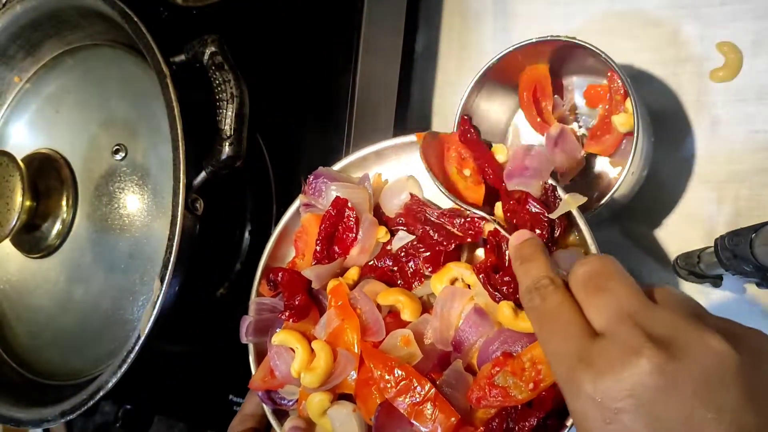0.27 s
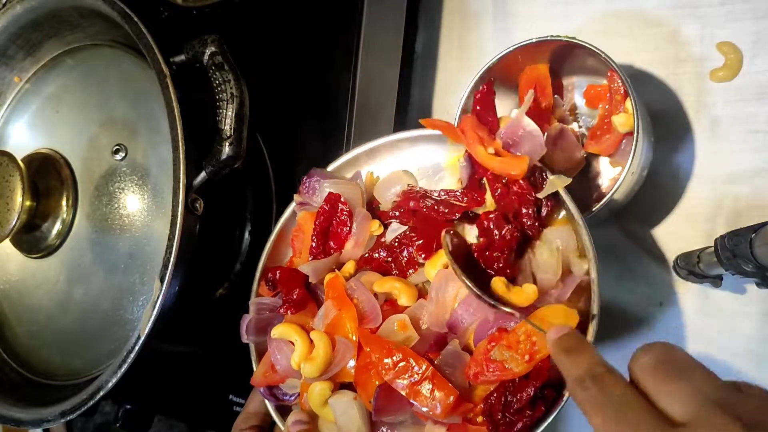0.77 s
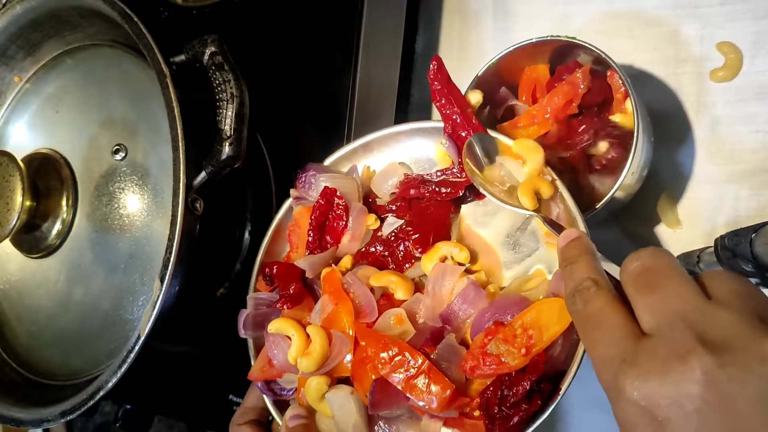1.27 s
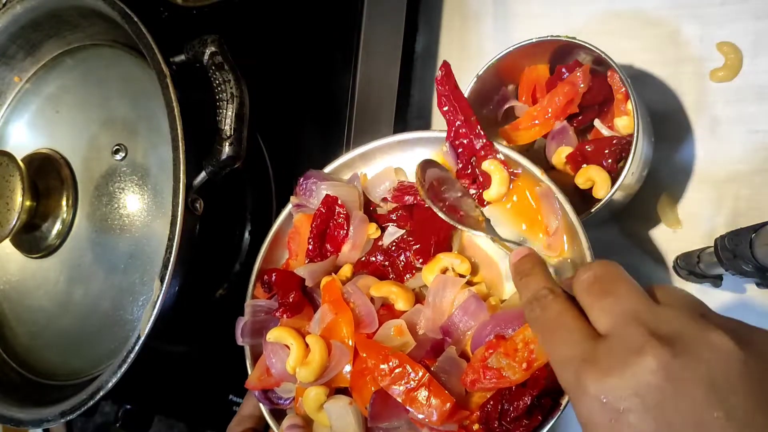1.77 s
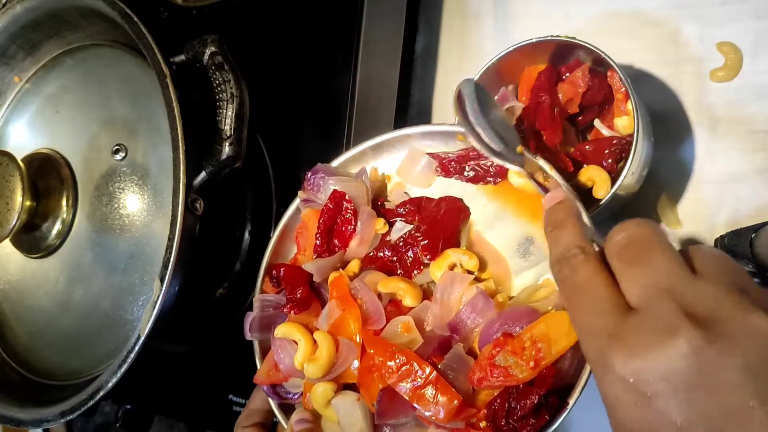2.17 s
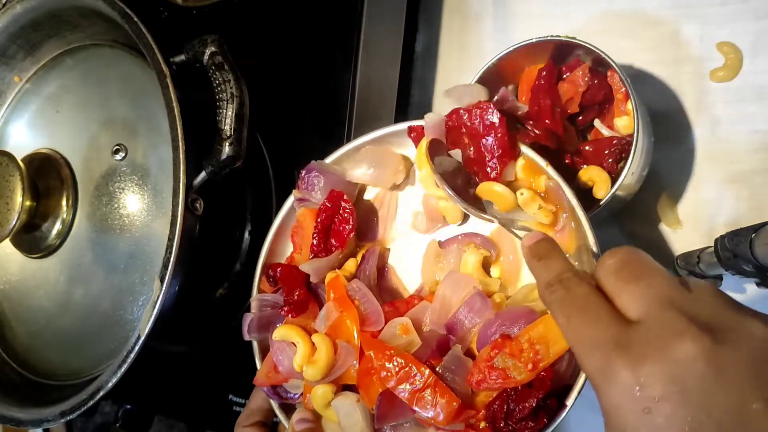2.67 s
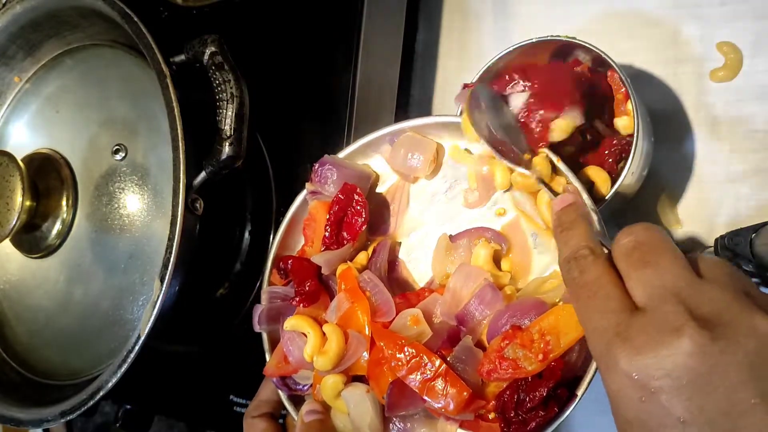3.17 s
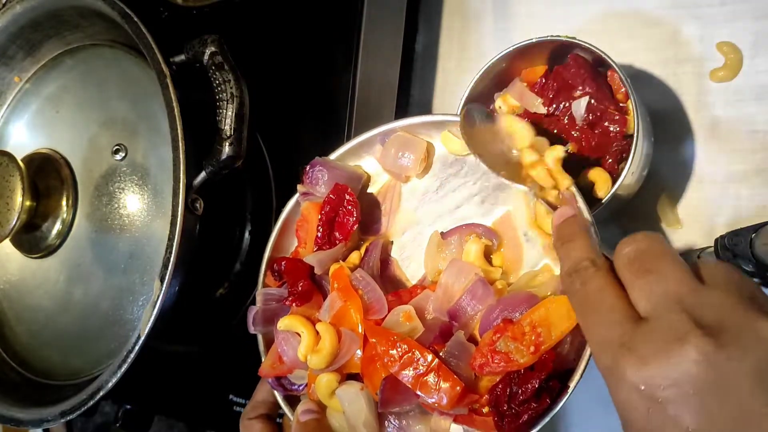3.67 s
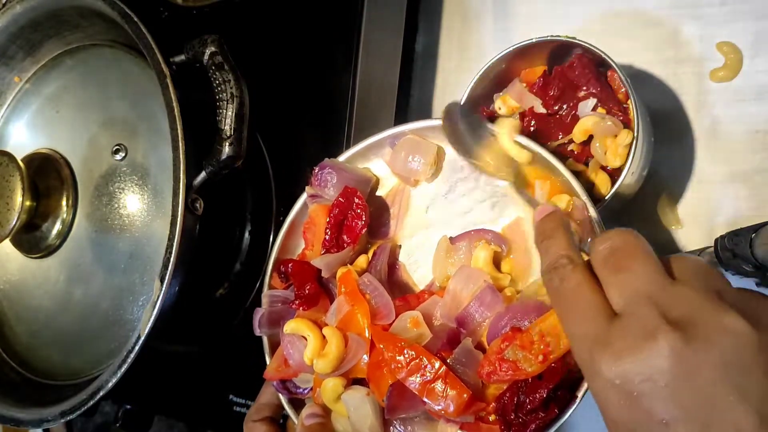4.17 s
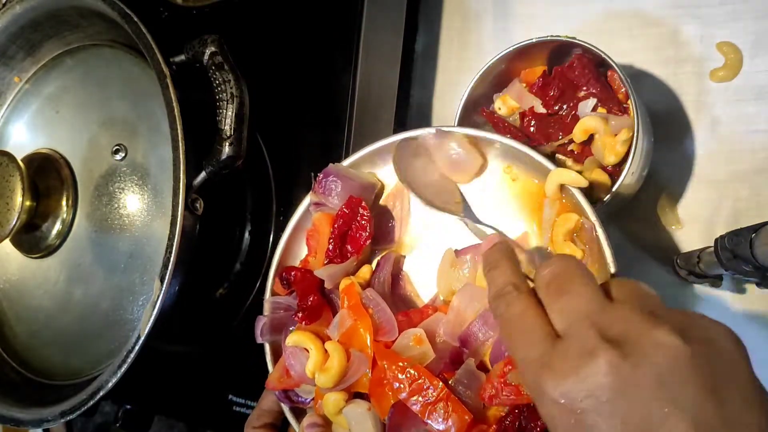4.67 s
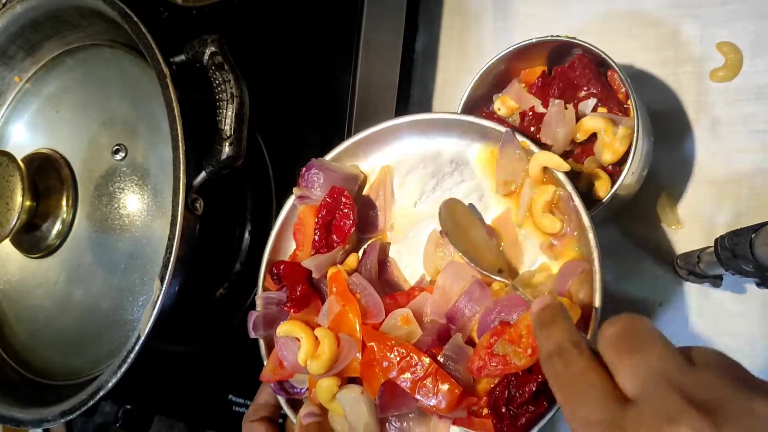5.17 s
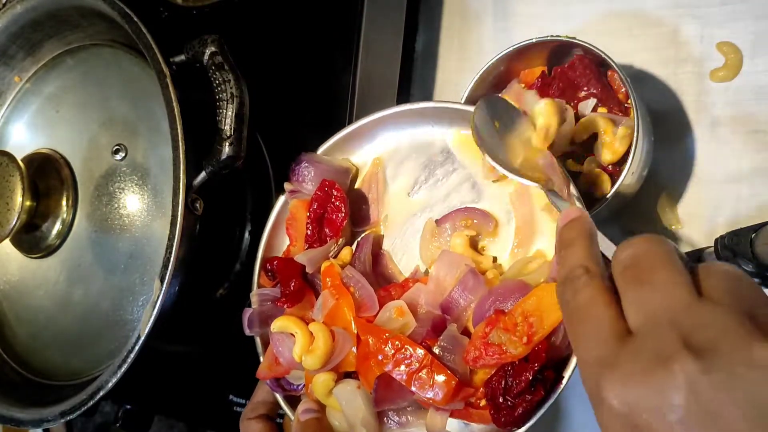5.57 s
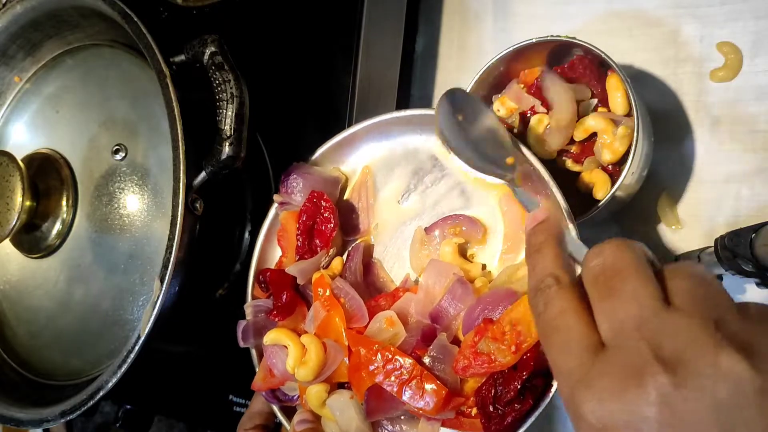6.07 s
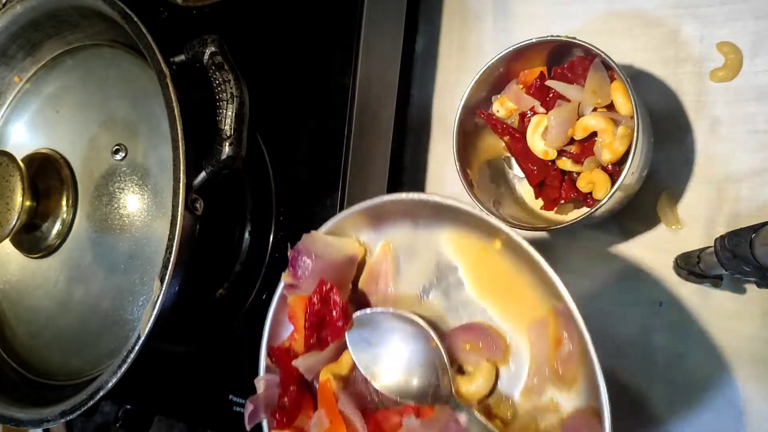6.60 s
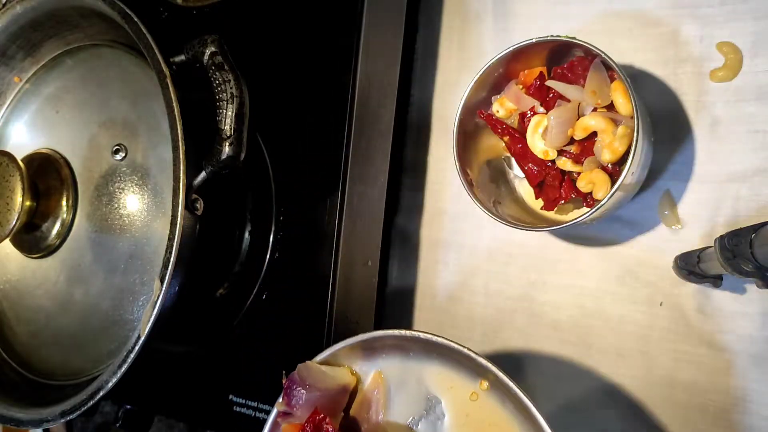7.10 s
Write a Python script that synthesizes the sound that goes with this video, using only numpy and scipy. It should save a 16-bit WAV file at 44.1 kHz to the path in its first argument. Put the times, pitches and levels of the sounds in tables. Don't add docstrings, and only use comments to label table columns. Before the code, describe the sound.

Steady whirring fan with rushing air, broken by short metallic spoon knocks, raspy plate scrapes and soft thuds of falling food.

```python
import sys
import numpy as np
from scipy import signal
from scipy.fft import rfft, irfft, next_fast_len
from scipy.io import wavfile
from scipy.ndimage import uniform_filter1d

SR = 44100
rng = np.random.default_rng(int(sys.argv[2]) if len(sys.argv) > 2 else 0)


def gain_from_db(level_db):
    decades = np.asarray(level_db, float) / 20
    return 10 ** decades


def inscribe(sig):
    pcm = np.round(np.clip(np.atleast_2d(sig).T, -1, 1) * 32767)
    wavfile.write(sys.argv[1], SR, pcm.astype(np.int16))


N = 323649
T = np.arange(N) / SR
HZ = np.maximum(np.fft.rfftfreq(next_fast_len(N, real=True), 1 / SR), 1)
MID_SIDE = np.array([[1], [-1]])

# frequency in Hz, left minus right in dB.
FAN_LEAN = [(60, 1), (110, 3), (200, -4), (370, -1), (680, -1), (1250, 0.5), (2290, -1.0), (4210, -1.0),
            (7720, -2), (14200, 12.5)]
# frequency in Hz, width in Hz, level in dB.
PLATE_MODES = [(955, 47, 0.5), (1623, 41, 10), (1990, 147, 11.5), (2380, 33, -23), (2930, 93, -4),
               (4050, 80, 2), (4420, 18, -0.5), (4500, 31, 4), (4990, 150, 0), (5220, 75, 1.5),
               (6010, 96, 2), (6760, 17, -32), (7150, 370, 8), (7600, 32, -57), (8330, 40, 6),
               (8114, 34, 7), (9150, 57, 0), (9820, 37, -21.5), (10500, 25, -37), (10900, 33, -12),
               (11100, 23, -40), (11700, 48, -39), (11800, 220, -41), (12700, 27, -25), (12700, 130, -26)]
# start in seconds, peak in dB, favoured pitch in Hz, share of crack in dB,
# dullness in dB per octave.
SPOON_BLOWS = [(0.9476, -19.5, 2380, 1, 3), (1.0562, -46, 3360, -3, 0), (1.1886, -44.5, 2000, 11.5, 15),
               (1.242, -50, 2900, 8.5, 1.5), (1.4051, -47, 6960, 4, -8), (1.455, -44.5, 2900, -8, 0),
               (1.9492, -40, 2186, 4, 0.5), (1.999, -46.5, 2160, 7, 2.5), (2.35, -55, 2286, -12, -7),
               (2.5974, -57, 2080, -34, 6), (2.6139, -55, 2330, 14, 16), (2.6525, -49, 3100, 3, -4.5),
               (3.532, -17, 1750, -4.5, 3), (3.5968, -29.5, 1990, -3, 1.5), (4.0374, -10.5, 1758, 1, 11),
               (4.0462, -21, 1750, 0, 4), (4.1165, -15, 4990, -2, 1.7), (4.5851, -30.5, 3150, 6, 5.5),
               (4.7252, -16.5, 2900, 3, 2.5), (5.3672, -18.5, 1360, -2.5, 10.5),
               (5.8731, -14.5, 1670, 0.5, 7), (5.9614, -16.5, 2090, -5, 8.5),
               (6.0041, -28.5, 6590, -1.5, -0.5)]


def table(points, hz):
    f, v = np.transpose(points)
    return np.interp(np.log(hz), np.log(np.maximum(f, 1)), v)


def unit(x):
    return x / np.sqrt(np.mean(x ** 2))


def colour(x, db):
    size = next_fast_len(N, real=True)
    return irfft(rfft(x, size) * gain_from_db(db), size)[..., :N]


def walk(rate, size=N):
    k = int(SR / rate)
    steps = np.repeat(rng.standard_normal(size // k + 1), k)
    return unit(uniform_filter1d(uniform_filter1d(steps, k), k)[:size])


def resonances(peaks, order):
    return sum(db / (1 + (2 * (HZ - hz) / width) ** order) for hz, width, db in peaks)


def modes(peaks):
    hz, width, db = np.transpose(peaks)
    width = np.maximum(width, 34)
    return hz, db + 20 * np.log10(width), np.log(1000) / np.pi / width


def ring(push, hz, db, t60, spread, sway_db=0):
    out = np.zeros((2, push.shape[-1]))
    pushes = np.broadcast_to(push, (len(hz), push.shape[-1]))
    for f, gain, fall_s, turn, drive in zip(hz, gain_from_db(db), t60, spread, pushes):
        if sway_db:
            drive = drive * gain_from_db(sway_db * walk(22))
        pole = np.exp((2j * np.pi * f - np.log(1000) / fall_s) / SR)
        z = signal.lfilter([gain], [1, -pole], drive)
        out += z.imag * np.cos(turn) + z.real * np.sin(turn) * MID_SIDE
    return out


def comb(bins):
    depth_db, fineness_hz = 6, 45
    k = max(int(fineness_hz * bins * 2 / SR), 1)
    return depth_db * unit(uniform_filter1d(uniform_filter1d(rng.standard_normal(bins), k), k))


def air():
    # frequency in Hz, density in dB per Hz.
    rush = [(12, -65), (28, -8.5), (48, -8.5), (102, -8), (154, -6), (209, -9.5), (325, -11.5), (383, -15),
            (452, -5.5), (665, -17.5), (1900, -24), (2300, -23), (3210, -29), (3480, -29.5), (9150, -34.5),
            (14600, -51.5)]
    # frequency in Hz, side minus mid in dB.
    diffuseness = [(60, 3), (110, -16), (200, 2), (370, -38), (680, -1), (1250, 2), (2290, -2), (4210, 2.5),
                   (7720, -10.5), (14200, -14)]
    # frequency in Hz, width in Hz, lift in dB.
    duct = [(101, 11, 6.5), (126, 5.5, 7.5), (161, 4.7, 8), (322, 44, 9.5), (449, 66, 9.5), (492, 40, 4.5),
            (826, 37, 6.5), (1142, 13, 7.5), (2226, 300, 7), (5600, 140, 4), (7030, 230, 3.5)]
    # time in seconds, level in dB.
    sizzle = [(0, -1), (1.5, -1.2), (3, -1), (5, -1), (6.5, -1.5), (7.34, -0.5)]
    db = table(rush, HZ) + resonances(duct, 4)
    mid = colour(rng.standard_normal(N), db)
    side = colour(rng.standard_normal(N), db + table(diffuseness, HZ))
    lean = table(FAN_LEAN, HZ) / 2
    pair = np.array([colour(mid + side, lean), colour(mid - side, -lean)])
    bass = uniform_filter1d(pair, size=21)
    pair = bass + (pair - bass) * gain_from_db(np.interp(T, *np.transpose(sizzle)))
    return pair * gain_from_db(-50.5 + .5 * walk(1.3)) / np.sqrt(np.mean(mid ** 2))


def motor(wobble_db=1.95, drift_rad=0.84, turn=0.57):
    # frequency in Hz, rms level in dB.
    lines = [(215.3, -74), (333.8, -64), (436.0, -56.5), (532.9, -60.5), (581.4, -96), (737.5, -74.5),
             (818.3, -84), (1599, -79.5), (1798, -81), (2083, -71.5), (2180, -94), (2277, -72),
             (2326, -69.5), (2859, -81), (3440, -73.5), (5755, -83.5)]
    out = 0
    for hz, db in lines:
        phase = 2 * np.pi * hz * T + drift_rad * walk(2.884) + 2 * np.pi * rng.random()
        side = np.tanh(turn * np.log2(hz / 60) * rng.standard_normal() * 0.31)
        level = gain_from_db(db + table(FAN_LEAN, hz) * MID_SIDE / 2) * gain_from_db(wobble_db * walk(13))
        tone = np.sqrt(2) * level * np.sin(phase + side * MID_SIDE)
        out = out + tone / max(np.cos(side), .5)
    return out


def blade():
    tone_hz, drift_hz, level_db, sway_db = 157.2, 0.36, -52.8, -0.4
    phase = 2 * np.pi * np.cumsum(tone_hz + drift_hz * walk(2.81)) / SR
    level = gain_from_db(level_db + sway_db * walk(3.85) + 1.4 * MID_SIDE)
    return np.sqrt(2) * level * np.sin(phase + 0.2 * MID_SIDE)


def thuds():
    # start in seconds, pitch in Hz, level in dB, t60 in seconds.
    lumps = [(6.04, 190, -44, .12), (4.243, 270, -46, .08), (1.058, 1150, -41, .08),
             (1.078, 1300, -43, .06), (1.243, 1350, -47, .04), (1.42, 1550, -47, .08),
             (4.195, 1580, -40, .2), (4.828, 1500, -42, .06), (4.855, 1300, -43, .08),
             (5.993, 910, -42, .2), (5.55, 920, -51, .1), (4.745, 920, -41, .05), (1.456, 2780, -48, .07),
             (5.552, 2840, -42, .05), (4.638, 4050, -46, .12), (5.385, 930, -44, .3),
             (1.951, 1400, -48, .05), (2.0, 1400, -49, .06), (0.949, 2050, -30, .05)]
    out, t = np.zeros(N), T[:SR // 2]
    for s, hz, db, t60 in lumps:
        i = int(s * SR)
        soft_start = 1 - np.exp(-t / 0.00095)
        out[i:i + len(t)] += gain_from_db(db - 60 * t / t60) * soft_start * np.sin(2 * np.pi * hz * t)
    return out


def ticks():
    # start in seconds, peak in dB, seconds to fall 20 dB.
    taps = [(1.9494, -47, .008), (2.6527, -44, .005), (4.1172, -29, .005), (4.0378, -30, .004),
            (5.9618, -33, .004), (4.2113, -33, .005), (4.7256, -30, .005)]
    out, t = np.zeros((2, N)), T[:SR // 20]
    for s, db, fall_s in taps:
        mid, side = rng.standard_normal((2, len(t)))
        bright = np.diff(mid + .5 * side * MID_SIDE, prepend=0) / 3
        i = int(s * SR)
        out[:, i:i + len(t)] += bright * gain_from_db(db - 20 * t / fall_s)
    return out


def pressure():
    # time of most pressure in seconds, level in dB, seconds to rise 20 dB,
    # seconds to fall 20 dB, weight in dB (more low ring, less hiss).
    slides = [(0.993, -36, 0.027, 0.14, -5), (1.055, -37.5, 0.067, 0.078, -0.5),
              (1.14, -53.5, .03, 0.16, 5.5), (1.25, -54, 0.44, .03, 0), (1.404, -46, 0.028, 0.19, -1),
              (1.445, -41, 0.058, 0.074, -2), (1.96, -52, .01, 0.37, 1.5), (2.008, -48, .03, .03, 4),
              (2.656, -62, .01, 0.24, -8), (3.598, -35, 0.05, 0.048, 0.5), (4.08, -38.5, 0.026, .15, -3),
              (4.231, -29, 0.071, 0.043, -1.8), (4.212, -29, 0.014, 0.087, 0.5),
              (4.605, -40.5, 0.013, 0.48, 0), (4.705, -34, 0.076, .03, -1.5),
              (4.822, -34.5, 0.049, 0.12, -0.5), (4.87, -35.5, .1, 0.03, -3), (5.24, -61, 0.11, 0.29, 4),
              (5.44, -41.5, 0.093, 0.19, 2), (5.554, -38, 0.031, 0.044, 0), (5.93, -42, 0.043, 0.11, 6.5),
              (6.008, -30, 0.043, 0.052, -2)]
    out = np.zeros((3, N))
    rise, fall, weight = .003, 0.077, 3
    rattles = [(s + rise, db - 14, rise, fall, weight) for s, db, *_ in SPOON_BLOWS]
    for s, db, rise_s, fall_s, weight_db in slides + rattles:
        near = slice(int((s - .5) * SR), int((s + .5) * SR))
        t = T[near] - s
        fall_db = np.maximum(-20 * t / fall_s, -9.5 - 20 * t / 0.11)
        shape = gain_from_db(db + np.where(t < 0, 20 * t / rise_s, fall_db))
        tilt_db = np.array([[-5 + weight_db], [0], [-1.25 - 0.18 * weight_db]])
        out[:, near] = np.maximum(out[:, near], shape * gain_from_db(tilt_db))
    return out


def scrapes(slips_hz=3000, size_db=2, turn=0.75):
    # frequency in Hz, density in dB per Hz.
    rasp_colour = [(350, -47), (600, 2.5), (895, -8), (1090, -43), (1550, 12), (1840, 13.5), (3090, 9.5),
                   (3630, 7), (4090, 10), (5700, 6), (6350, 4.5), (8600, -6.5), (12500, -23), (14500, -39)]
    ring_over_rasp_db = -0.2
    hz, db, t60 = modes(PLATE_MODES)
    low, main, top = pressure()
    chance = rng.random((2, N))
    slip_size = gain_from_db(-size_db * np.log(1 - chance[1])) * np.sign(rng.standard_normal(N))
    slips = (chance[0] < slips_hz / SR) * slip_size
    spread = turn * np.tanh(2 * rng.standard_normal(len(hz)))
    tone = ring(slips, hz, db, t60, spread, sway_db=4.2)
    rasp = 0
    for spot in range(3):
        grit = rng.standard_normal((2, N)) * gain_from_db(2.0 * walk(70) + 1.0 * walk(14))
        pair = grit[0] + .75 * grit[1] * MID_SIDE
        rasp = rasp + colour(pair, table(rasp_colour, HZ) + .7 * comb(len(HZ)))
    out = 0
    for gain, lo_hz, hi_hz in ((low, 500, 2300), (main, 2300, 5500), (top, 5700, 16000)):
        band = signal.butter(2, [lo_hz, hi_hz], "band", fs=SR, output="sos")
        ringing = gain_from_db(ring_over_rasp_db) * unit(signal.sosfilt(band, tone))
        out = out + gain * unit(ringing + unit(signal.sosfilt(band, rasp)))
    return out


def sings(turn=0.75):
    # time of most pressure in seconds, level in dB, seconds to rise 20 dB, seconds to fall 20 dB.
    pushes = [
        (1.0, -40.5, .05, .16),
        (1.44, -45.5, .08, .065),
        (3.598, -40, .07, .045),
        (4.225, -32.5, .05, .09),
        (4.845, -37.5, .07, .06),
        (5.555, -42, .04, .04),
        (6.01, -35, .045, .05),
    ]
    # frequency in Hz, width in Hz, level in dB.
    first_push = [(3070, 120, 0), (3430, 27, -1), (4830, 68, -2), (6200, 74, -1), (6720, 230, -3),
                  (8170, 170, -2), (9850, 38, -7), (10800, 28, -10), (11400, 71, -14), (12700, 87, -17),
                  (12900, 28, -23), (13500, 91, -22)]
    light_push = [(2790, 55, -4), (4440, 34, -5), (5890, 56, -7), (6480, 100, -7), (7150, 120, 0),
                  (8190, 150, -5), (9800, 31, -14), (10200, 33, -18), (10500, 110, -16)]
    nut_push = [(1990, 64, -2), (2450, 60, -7), (4080, 34, 0), (4650, 36, -5), (5180, 47, -8),
                (5980, 41, -11), (6830, 27, -8), (8310, 38, -4), (9310, 41, -24), (9800, 32, -13)]
    long_push = [(1580, 87, -3), (2340, 45, -3), (3100, 310, -3), (3430, 43, -5), (4140, 120, -3),
                 (4620, 37, -7), (4960, 71, -5), (5420, 27, -5), (6230, 37, -1), (7080, 110, -3),
                 (8140, 23, -2), (8320, 39, 0), (9880, 40, -17)]
    edge_push = [(1520, 48, -4), (2160, 90, -4), (3120, 72, -3), (4080, 62, -1), (4390, 64, -5),
                 (5130, 53, 0), (5950, 46, -5), (6170, 110, -1), (6990, 150, -4), (8080, 41, -5),
                 (9530, 69, -10), (9820, 120, -12)]
    short_push = [(2840, 74, -1), (4100, 52, 0), (4540, 29, -5), (5040, 60, -1), (6570, 33, -4),
                  (7370, 61, -2), (8670, 160, -16), (9520, 68, -8)]
    last_push = [(1980, 32, -4), (3120, 67, 0), (4330, 27, -2), (5050, 45, -4), (6150, 46, -3),
                 (6610, 52, -1), (7240, 89, -5), (7770, 42, -4), (8240, 24, -5), (9640, 55, -9),
                 (9950, 120, -16)]
    sung_modes = [first_push, light_push, nut_push, long_push, edge_push, short_push, last_push]
    out = np.zeros((2, N))
    for (s, db, rise_s, fall_s), peaks in zip(pushes, sung_modes):
        near = slice(int((s - .3) * SR), int((s + .3) * SR))
        t = T[near] - s
        shape = gain_from_db(np.where(t < 0, 20 * t / rise_s, -20 * t / fall_s))
        level = gain_from_db(db) * np.sqrt(np.mean(shape ** 2))
        hz, mode_db, t60 = modes(peaks)
        share = gain_from_db(mode_db) * np.sqrt(t60)
        share = share / np.sqrt(np.sum(share ** 2))
        for f, ring_s, gain in zip(hz, t60, share):
            drive = rng.standard_normal(len(t)) * gain_from_db(3 * walk(45, size=len(t)))
            spread = [turn * np.tanh(2 * rng.standard_normal())]
            tone = ring(drive, [f], np.zeros(1), [ring_s], spread) * shape
            out[:, near] += unit(tone) * gain * level
    return out


def blows(spot_db=4.0, favour_db=8, favour_oct=0.34, rise_s=0.0004, top_s=0.042, turn=0.93):
    # frequency in Hz, width in Hz, level in dB.
    under_food = [(1366, 84, -3.5), (1580, 71, -10), (2080, 170, 0), (2380, 53, -2), (2900, 84, 2),
                  (3580, 160, -7), (4330, 78, -13), (5950, 68, -17), (6460, 170, -16), (7000, 150, -14),
                  (8900, 73, -8), (9100, 92, -27)]
    bare_near = [(457, 84, 2.5), (1400, 160, -5.5), (1740, 31, 5), (1950, 150, 1), (2410, 75, -7),
                 (3220, 100, 2.5), (5170, 41, -4), (6300, 76, -20), (7140, 96, -8), (8040, 84, -8),
                 (8840, 250, -20), (9500, 210, -32)]
    bare_far = [(409, 59, -3), (640, 160, -8), (1360, 40, -3), (1640, 50, 0), (2130, 65, -5),
                (2990, 50, -4), (3280, 40, -2), (4090, 50, -9), (5400, 51, -15), (6360, 60, -11),
                (6820, 40, -14), (7760, 40, -18), (9150, 60, -16), (10000, 87, -20)]
    rim = [(931, 24, -4), (1660, 47, -5), (2040, 90, -6), (2830, 80, 0), (3810, 30, -5), (4440, 30, -9),
           (4960, 70, -1), (5980, 100, -5), (7260, 50, -8), (7960, 40, -12), (9450, 80, -12),
           (11000, 90, -15), (12000, 60, -20), (12700, 250, -16)]
    jar_lip = [(2040, 50, 0), (2900, 90, 1), (4050, 30, -2), (4350, 120, -3), (5000, 40, -8),
               (6350, 53, -2), (6630, 30, -9), (7000, 70, -11), (8150, 60, -7), (8660, 40, -7),
               (9750, 40, -14), (10700, 41, -18), (11400, 40, -19), (11700, 110, -23)]
    middle = [(668, 26, -6), (1360, 32, 0), (1610, 66, -5), (1790, 20, -8), (2020, 20, -3),
              (2700, 110, -11), (3400, 23, -8), (3660, 110, -11), (4100, 45, -9), (4810, 71, -17),
              (5970, 22, -13), (7420, 76, -14), (8450, 44, -17), (9140, 91, -23)]
    wall_foot = [(443, 55, 0.5), (710, 150, -5.5), (915, 48, 2.5), (1674, 25, 6.5), (1960, 99, -4),
                 (2440, 140, 1), (3240, 150, -21), (3980, 240, -10), (4230, 340, -8), (5050, 67, -22),
                 (5900, 86, -23), (6590, 170, -2.5), (7930, 300, -10), (9600, 120, -12)]
    wall = [(821, 340, -9), (1370, 60, -4), (1670, 120, 2), (2080, 61, 6), (2740, 340, -1.5),
            (3610, 140, -2), (4230, 76, -16), (4900, 190, -10), (6130, 160, -15), (6820, 150, -13),
            (7740, 180, -14), (8900, 160, -5), (9350, 86, -6)]
    struck_spots = {.948: under_food, 3.533: bare_near, 4.038: bare_far, 4.117: rim,
                    4.726: jar_lip, 5.367: middle, 5.874: wall_foot, 5.962: wall}
    # frequency in Hz, density in dB per Hz.
    crack_colour = [(150, -38), (250, -9), (1650, -16), (2850, -0.5), (3560, -6.5), (5000, -24),
                    (5540, -25.5), (6140, -9.5), (12100, -30), (13700, -42), (14600, -49.5)]
    chatter_s, tremble_s, body_s = 0.0021, 0.014, .0105
    out, t = np.zeros((2, N)), T[:SR // 4]
    octave = np.log2(np.maximum(np.arange(len(t) // 2 + 1) * SR / len(t), 1) / 2500)
    rise = 1 - np.exp(-t / rise_s)
    for s, peak_db, hz0, crack_db, dull_db in SPOON_BLOWS:
        own = [peaks for when, peaks in struck_spots.items() if abs(when - s) < 1 / 200]
        hz, db, t60 = modes(own[0] if own else PLATE_MODES)
        spot, side = rng.standard_normal((2, len(PLATE_MODES)))[:, :len(hz)]
        chatter, mid, wide = rng.standard_normal((3, len(t)))
        if not own:
            favour = np.exp(-(np.log2(hz / hz0) / favour_oct) ** 2)
            db = db + spot_db * spot - dull_db * np.log2(hz / 2500) + favour_db * favour
        length = 0.84 + 0.0095 * (peak_db + 3)

        push = chatter ** 2 * np.exp(-t / chatter_s) + wide * np.exp(-t / tremble_s)
        push = push * rise * np.exp(2j * np.pi * (hz[:, None] * t + mid[:len(hz), None]))
        spread = turn * np.tanh(2 * side) * np.minimum(hz / 2000, 1)
        tone = ring(push, hz, db, t60 * length, spread)
        tone = tone / np.abs(tone.mean(axis=0)).max()

        crack_tilt = table(crack_colour, 2500 * 2 ** octave) - dull_db * np.maximum(octave, -1)
        crack_tilt = crack_tilt + (.35 if own else 1) * comb(len(octave))
        dense = mid + 0.52 * wide * MID_SIDE
        dense = unit(irfft(rfft(dense) * gain_from_db(crack_tilt), len(t)))
        body = uniform_filter1d(dense, size=7)
        treble = (dense - body) * np.exp(-t / top_s / length)
        crack = rise * (body * np.exp(-t / body_s / length) + treble)
        i = int(s * SR)
        out[:, i:i + len(t)] += gain_from_db(peak_db) * (tone + gain_from_db(crack_db) * crack / 3)
    return out


def steel_lean(spoon):
    # frequency in Hz, left minus right in dB.
    tilt = [(60, 3), (200, 1.5), (680, -4), (1250, 0), (2290, 1), (4210, -5.5), (7720, 1.5), (14200, 7)]
    hz, lean_db = np.transpose(tilt)
    sides = []
    for x, ear in zip(spoon, (1, -1)):
        gain = gain_from_db(ear * np.array([0, *lean_db, 0]) / 2)
        sides.append(signal.fftconvolve(x, signal.firwin2(65, [0, *hz, SR / 2], gain, fs=SR), "same"))
    return np.array(sides)


def notch_spoon(spoon):
    # frequency in Hz, width in Hz, level in dB.
    notches = [(5600, 170, -7), (7720, 140, -8), (9280, 130, -7), (14100, 600, -6)]
    return colour(spoon, resonances(notches, 2))


def kitchen(x):
    t60_s, top_t60_s = .33, .26
    t = T[:SR // 2]
    noise = rng.standard_normal((2, len(t)))
    soft = uniform_filter1d(noise, size=7)
    tail = soft * gain_from_db(-60 * t / t60_s) + (noise - soft) * gain_from_db(-60 * t / top_t60_s)
    tail *= np.clip(t / .008, 0, 1)
    return signal.fftconvolve(x, tail / np.sqrt(np.sum(tail ** 2) / 2), axes=1)[:, :N]


def scene():
    fan = air() + motor() + blade()
    spoon = steel_lean(blows() + scrapes())
    spoon = notch_spoon(spoon + sings()) + ticks()
    spoon = signal.sosfilt(signal.butter(3, 330, "high", fs=SR, output="sos"), spoon)
    return spoon + gain_from_db(-13) * kitchen(spoon) + thuds() + fan


def band_limit(x):
    return signal.sosfilt(signal.butter(12, 14770, fs=SR, output="sos"), x)


def record(dry):
    cut = signal.sosfilt(signal.ellip(10, .3, 85, 14400, fs=SR, output="sos"), dry)
    return band_limit(cut)


dry = scene()
out = record(dry)
inscribe(out)
```